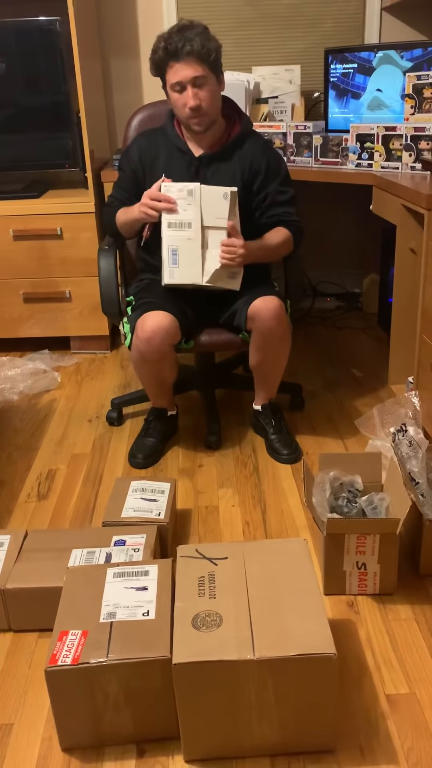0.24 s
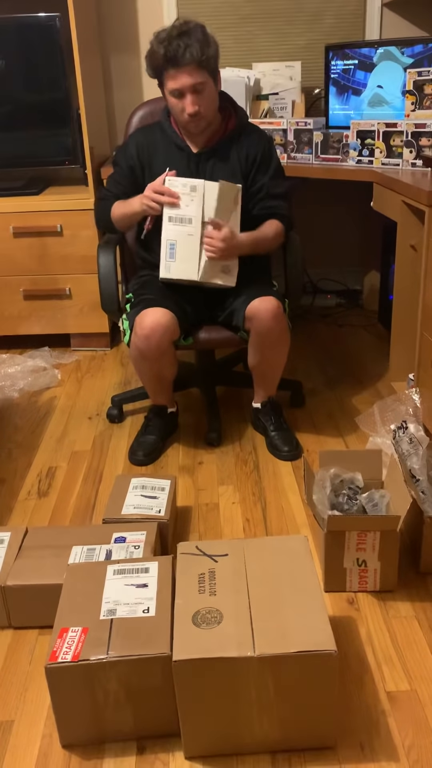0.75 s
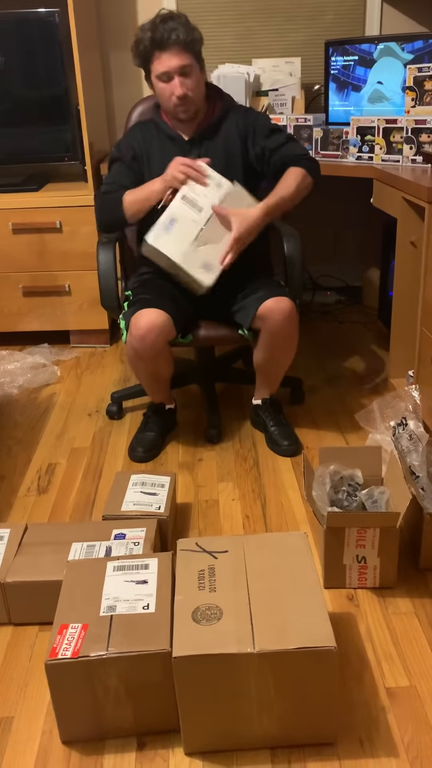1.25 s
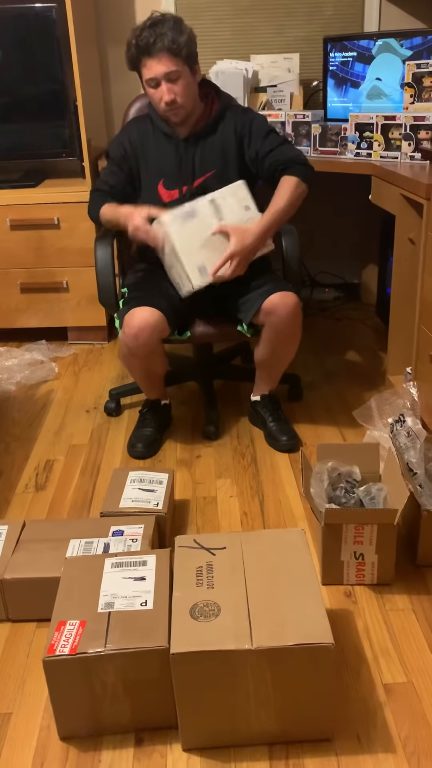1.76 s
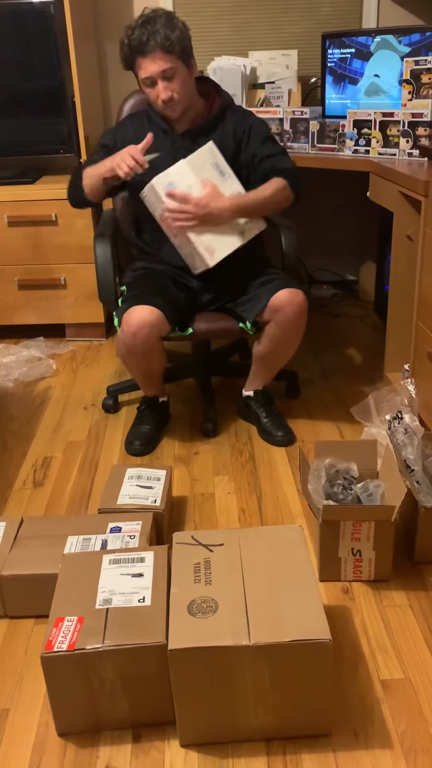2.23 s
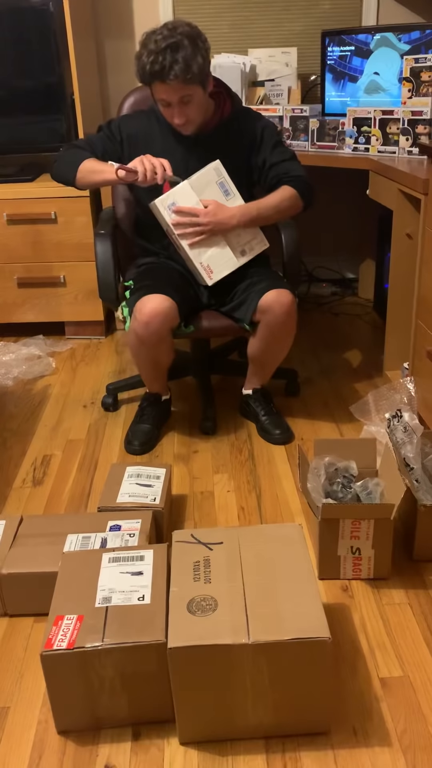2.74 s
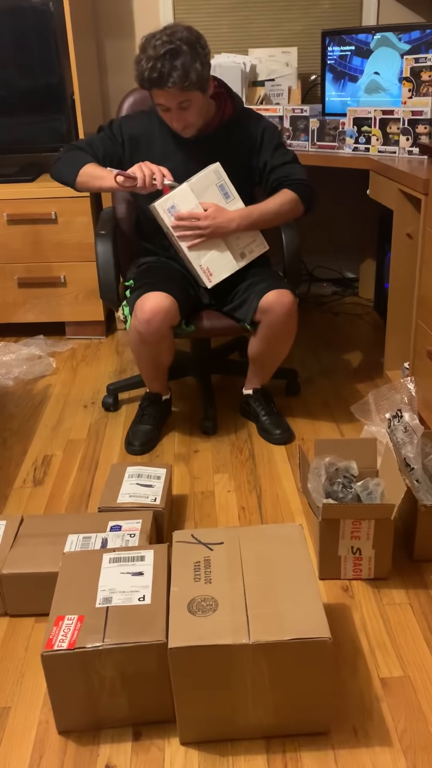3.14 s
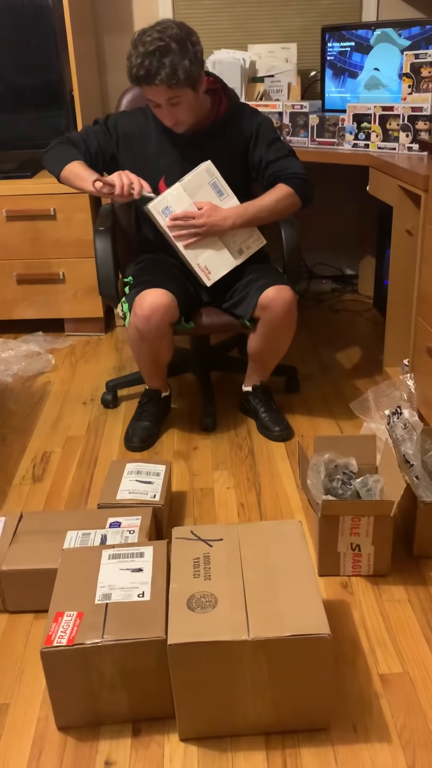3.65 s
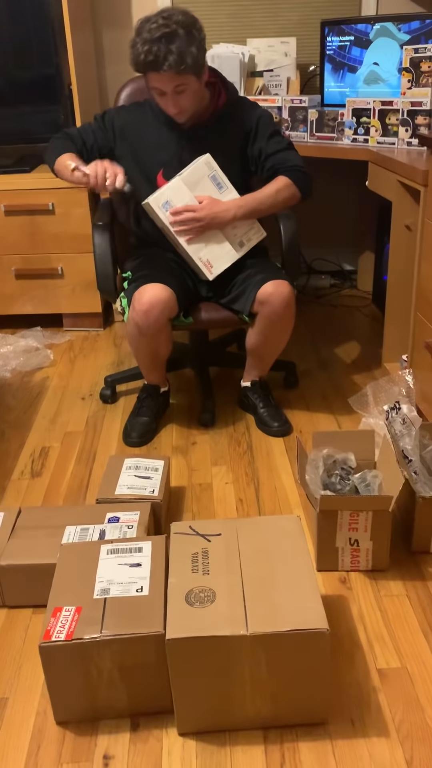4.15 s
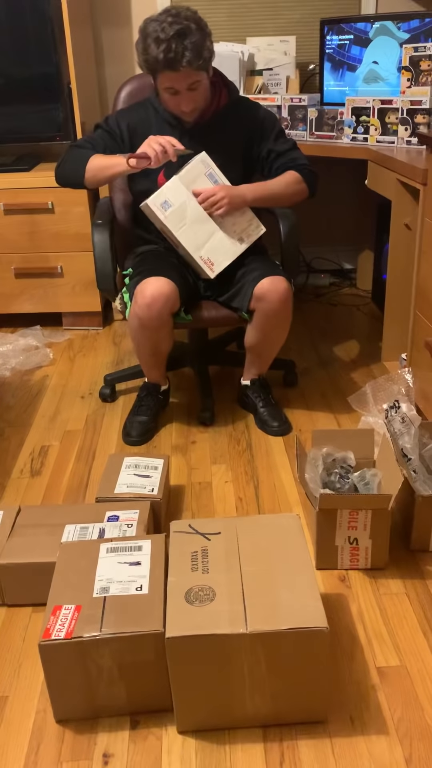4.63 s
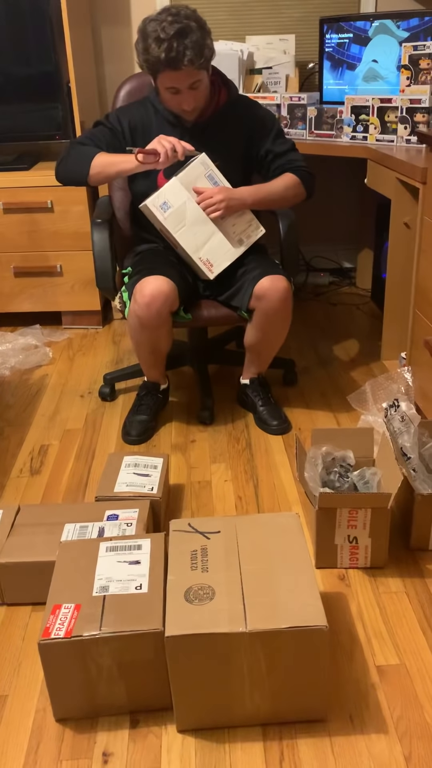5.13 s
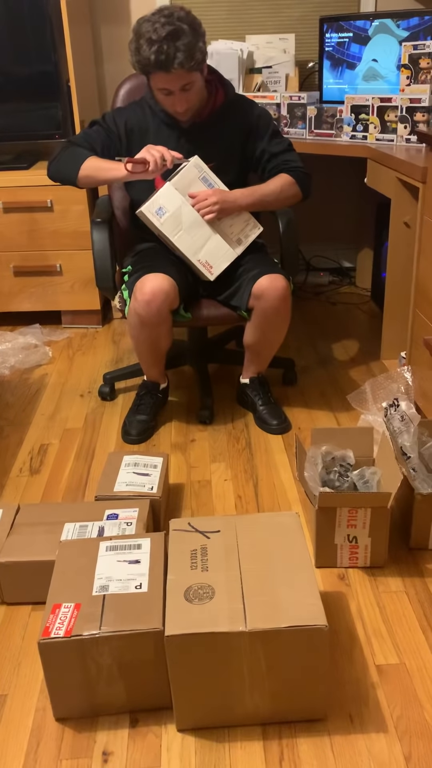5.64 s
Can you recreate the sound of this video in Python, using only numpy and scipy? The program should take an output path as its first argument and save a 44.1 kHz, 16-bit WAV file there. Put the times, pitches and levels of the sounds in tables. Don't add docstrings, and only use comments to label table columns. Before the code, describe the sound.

A cardboard box is slapped, turned and rubbed on a lap, then scissors scrape and saw through its tape in jerky bursts.

```python
import sys
import numpy as np
from scipy import signal
from scipy.fft import rfft, irfft, next_fast_len
from scipy.io import wavfile

SR = 44100
rng = np.random.default_rng(int(sys.argv[2]) if len(sys.argv) > 2 else 0)


def invert_db(x):
    u = np.asarray(x, float) / 20
    return 10 ** u


def materialize(psi):
    bounded = np.clip(np.atleast_2d(psi).T, -1, 1)
    quanta = np.round(bounded * 32767).astype(np.int16)
    wavfile.write(sys.argv[1], SR, quanta)


N = 259731
GRIP_S = 3.3


def rms_one(x):
    return x / np.sqrt(np.mean(x ** 2) + 1e-20)


def at_hz(points, hz):
    table_hz, values = np.transpose(points)
    return np.interp(np.log(hz + 1), np.log(table_hz), values)


def coloured(x, points):
    size = next_fast_len(N)
    gain = invert_db(at_hz(points, np.fft.rfftfreq(size, 1 / SR)))
    return irfft(rfft(x, size) * gain, size)[..., :N]


def band(x, edges_hz, order=2):
    return signal.sosfilt(signal.butter(order, edges_hz, "band", fs=SR, output="sos"), x)


def drift(rate):
    step = 40
    r = np.exp(-2 * step * np.pi * rate / SR)
    noise = rng.standard_normal(N // step + 2002)
    slow = signal.lfilter([1], [1, -2 * r, r * r], noise)[2000:]
    return np.interp(np.arange(N) / step, np.arange(len(slow)), rms_one(slow))


def ring(clicks, hz, width_hz):
    r, w = np.exp(-np.pi * width_hz / SR), 2 * np.pi * hz / SR
    return signal.lfilter([0, np.sin(w)], [1, -2 * r * np.cos(w), r * r], clicks + 1e-18)


def slips(per_s, spread_db, clump_db):
    sizes = invert_db(spread_db * np.minimum(rng.exponential(1, N), 4))
    signs = rng.choice([-1, 1], N)
    chance = per_s * invert_db(clump_db * drift(25)) / SR
    return sizes * signs * (rng.random(N) < chance)


def rubbed(modes, level_db, per_s, spread_db, broad_db, edges_hz):
    train = rms_one(slips(per_s, spread_db, clump_db=3.0))
    rings = 0
    for k, (hz, width_hz, db) in enumerate(modes):
        rings = rings + invert_db(db) * ring(train, hz, width_hz) * (-1) ** k
    broad = band(rng.standard_normal(N), edges_hz)
    return rms_one(rms_one(rings) + invert_db(broad_db) * rms_one(broad)) * invert_db(level_db)


def struck(rows, modes, lift_db, focus_db, scatter_db, contact):
    s, peaks_db, colours_hz = np.array(rows)[:, :3].T
    at, out = (s * SR).astype(int), 0
    luck = rng.standard_normal((len(at), len(modes)))
    for k, (hz, width_hz, db) in enumerate(modes):
        clicks = np.zeros(N)
        octaves_off = np.abs(np.log2(hz / colours_hz))
        near_db = db - focus_db * octaves_off
        clicks[at] = invert_db(peaks_db + lift_db + near_db + scatter_db * luck[:, k])
        pushes = signal.oaconvolve(clicks, contact)[:N]
        out = out + ring(pushes, hz, width_hz) * (-1) ** k
    return out


# pitch in Hz, level in dB.
HUSH = [(13, -31), (22, -1), (290, -5.5), (869, -14.5), (997, -19), (1110, -17.5), (5320, -38.5),
        (9200, -35), (11200, -40), (13100, -31), (15500, -50)]


def hush():
    mid, side = coloured(rng.standard_normal((2, N)), HUSH)
    side = signal.sosfilt(signal.butter(1, 350, "high", fs=SR, output="sos"), side)
    level_db = -66 + 0.74 * drift(3)
    return invert_db(level_db) * rms_one(mid + side * [[1], [-1]])


def room(x):
    t60_s, wall_cut_hz = 0.19, 5700
    size = next_fast_len(N + SR)
    hz = np.fft.rfftfreq(size, 1 / SR)
    turn = np.exp(-2j * np.pi * hz / SR)
    dull = np.exp(-2 * np.pi * wall_cut_hz / SR)
    wall = (1 - dull) / (1 - dull * turn)
    reply = np.zeros((2, len(hz)), complex)
    lags = (rng.uniform(.006, .03, 16) * SR).astype(int)
    for k, lag in enumerate(lags):
        loop = invert_db(-60 * lag / SR / t60_s) * wall * turn ** lag
        reply[k % 2] += loop / (1 - loop) * (-1) ** (k // 2)
    reply[1] *= hz ** 2 / (hz ** 2 + 350.0 ** 2)
    mid, side = irfft(rfft(x, size) * reply, size)[:, :N]
    return mid + side * [[1], [-1]]


def nearby(x):
    age = np.arange(int(.04 * SR)) / SR
    scatter = rng.standard_normal((2, len(age))) * np.exp(-age / 0.0099) * (age > .002)
    return signal.oaconvolve(x[None], scatter / np.linalg.norm(scatter[0]), axes=1)[:, :N]


# start in seconds, end in seconds, level in dB.
BRUSHES = [
    (2.93, 3.165, -70),
    (4.598, 4.85, -71.5),
]
# pitch in Hz, width in Hz, level in dB.
RIDGES = [(1540, 90, -27), (2040, 70, -28)]


def sleeve():
    t, edge_s = np.arange(N) / SR, 0.012
    held = 0
    for start, end, db in BRUSHES:
        held = held + invert_db(db) * np.clip(np.minimum(t - start, end - t) / edge_s, 0, 1)
    cloth = band(rng.standard_normal((2, N)), [1200, 2150], order=5)
    cloth = cloth + sum(invert_db(db) * ring(cloth, hz, width_hz) for hz, width_hz, db in RIDGES)
    return held * invert_db(1.7 * drift(26)) * rms_one(cloth)


# time in seconds, contact level in dB.
CONTACT = [(0, -41), (0.39, -46), (0.6, -59.5), (1.1, -50.5), (1.45, -57), (2.0, -52.5), (2.2, -68.5),
           (2.34, -54), (2.68, -58), (2.75, -95), (3.0, -72), (3.16, -83), (3.3, -74.5), (4.2, -71),
           (4.7, -72), (4.82, -96.5), (5.3, -84), (5.6, -67)]
# peak time in seconds, seconds to rise 20 dB,
# seconds to fall 20 dB, pressure in dB, slip in dB.
TURNS = [(0.045, 0.8, 0.12, -30, -22.5), (0.33, 1, -0.5, -53, -48.5), (0.464, 0.01, 0.21, -41, -35.5),
         (0.7, 0, 0.33, -44, -47), (0.727, 0, 0.07, -42, -32), (0.805, 0.03, 0.1059, -43, -34.5),
         (0.924, -0.13, 0.12, -57.5, -34), (1.1, -0.17, 0.1, -46, -47.5), (1.225, 0.05, 0.1, -41, -39.5),
         (1.3, -0.03, 0.2, -57.5, -44.5), (1.5, 0.06, 0.04, -43, -56), (1.69, 0.17, 0.16, -50, -43),
         (1.756, -0.05, 0.02, -42, -57), (1.814, 0.16, 0.22, -46.5, -67), (1.922, -0.1, 0.15, -47, -49.5),
         (2.1, 0.07, 0.11, -35.5, -49.5), (2.426, 0, 0.08, -50, -80), (2.55, 0.035, 0.15, -46.5, -47.5),
         (2.838, -1.1, 0.2, -63.5, -69.5), (3.233, 0.07, 0.1, -57.5, -57)]
# peak time in seconds, seconds to rise 20 dB,
# seconds to fall 20 dB, pressure in dB, slip in dB.
CUTS = [(3.373, 0.04, 0.0649, -42.5, -39.5), (3.554, 0.0225, 0.2045, -43, -40.5),
        (3.64, 0.1839, 0.16, -46.5, -49.5), (3.7, 0.0457, 0.073, -34, -37),
        (3.79, 0.1934, 0.18, -45.5, -41.5), (3.874, 0.29, 0.01, -44, -44.5),
        (3.985, 0.04, 0.1079, -34.5, -35.5), (4.018, 0.0637, 0.0758, -36.5, -44.5),
        (4.316, 0.06, 0.1, -49.5, -45), (4.602, 0.15, 0.2, -45, -46), (4.934, 3, 0.5, -65, -86),
        (5.2, -0.08, 0.36, -59, -69), (5.44, 0.07, 0, -45.5, -54.5), (5.628, 0.1056, 0, -41.5, -50),
        (5.679, 0.1135, 0.06, -43, -43), (5.722, 0.05, -0.15, -40.5, -49.5), (5.816, 0.03, 0.3, -35.5, -40),
        (5.87, 0.07, 0, -33, -42)]


def handling():
    t = np.arange(0, N + 32, 32) / SR
    rest = invert_db(np.interp(t, *np.transpose(CONTACT)))
    rest_share_db = np.array([[-7.5], [-6.5], [0]])
    power = (rest * invert_db(rest_share_db)) ** 2
    for s, rise_s, fall_s, pressure_db, slip_db in [*TURNS, *CUTS]:
        panel_db = pressure_db + 0.36 * (slip_db - pressure_db) - 6.5
        before, after = (s - t) / max(rise_s, .005), (t - s) / max(fall_s, .01)
        shape_db = -20 * np.where(t < s, before, after)
        power = power + invert_db(np.array([[pressure_db], [panel_db], [slip_db]]) + shape_db) ** 2
    return [np.interp(np.arange(N) / SR, t, 10 * np.log10(p)) for p in power]


# time in seconds, level in dB.
LURCHES = [
    (1.2, -46),
    (1.5, -60),
    (1.76, -56),
    (2.07, -50),
    (2.2, -51.5),
    (2.46, -60),
    (3.221, -62.5),
    (5.73, -52),
]


def lap(hollow_db):
    t, swell_s = np.arange(N) / SR, 0.09
    lurch = sum(invert_db(db - 20 * np.abs(t - s) / swell_s) for s, db in LURCHES)
    level = invert_db(-34 + 0.62 * hollow_db) + lurch
    return invert_db(0.5) * level * rms_one(band(rng.standard_normal(N), [28, 100]))


# pitch in Hz, width in Hz, level in dB.
HOLLOW = [(66, 90, -10.5), (140, 19, 0), (188, 14, -5), (218, 23, -6.5), (285, 25.2, 2.5), (321, 52, 3),
          (406, 42, 2)]
# time in seconds, peak in dB, colour in Hz.
THUMPS = [(0.022, -23, 420), (0.461, -33.5, 323), (0.68, -38, 390), (0.772, -37, 380), (1.073, -38, 167),
          (1.179, -21.5, 315), (1.37, -46.5, 284), (1.48, -44, 122), (1.745, -23.5, 160),
          (1.905, -36.5, 413), (2.055, -24, 310), (2.115, -37, 300), (2.16, -46, 145), (2.405, -42.5, 224),
          (2.538, -45.5, 406), (2.579, -41, 415), (2.67, -50, 416)]
# time in seconds, peak in dB, colour in Hz.
JOLTS = [(3.218, -62, 96.9), (3.366, -37, 146), (3.409, -37.5, 188), (3.551, -40, 143), (3.586, -31, 140),
         (3.628, -34, 256), (3.689, -25, 150), (3.717, -30.5, 140), (3.788, -34.5, 152), (3.864, -29, 149),
         (3.964, -31.5, 137), (3.994, -29, 280), (4.012, -22.5, 247), (4.042, -27, 140),
         (4.301, -43.5, 339), (4.468, -48, 159), (4.595, -36, 428), (4.971, -52, 272), (5.194, -48, 285),
         (5.365, -57, 289), (5.436, -31.5, 153), (5.597, -47, 133.3), (5.624, -32, 140), (5.661, -38, 140),
         (5.714, -29.5, 148), (5.821, -30, 430), (5.849, -31.5, 277), (5.868, -43, 304)]


def hollow(level_db):
    rub = rubbed(HOLLOW, level_db - 3.5, per_s=160, spread_db=2.0, broad_db=-2.5, edges_hz=[90, 500])
    palm = np.hanning(int(0.00084 * SR))
    return rub + struck([*THUMPS, *JOLTS], HOLLOW, lift_db=-2, focus_db=11.0, scatter_db=2.0,
                        contact=palm / palm.sum())


# pitch in Hz, width in Hz, level in dB.
PANELS = [(582, 40, 1.5), (620, 67, -1.5), (780, 110, 5), (930, 80, 2), (1000, 55, 5), (1089.5, 20, -4.5),
          (1150, 230, 1), (1340, 140, -3.5), (1700, 71, -6.5), (1370, 36, -5.5), (1780, 160, -11),
          (2180, 140, 1), (2480, 370, -1)]
# pitch in Hz, width in Hz, level in dB.
GRIPPED = [(285, 33, -2), (606.7, 28, -2.5), (1010, 40, 1.5), (1340, 35, -4.5), (2444, 25, -11),
           (3550, 180, -11)]


def panels(level_db):
    clamped, edges_hz = np.arange(N) > GRIP_S * SR, [420, 2800]
    loose = rubbed(PANELS, level_db - 2.0, per_s=480, spread_db=4.5, broad_db=-1.5, edges_hz=edges_hz)
    tight = rubbed(GRIPPED, level_db - 2.0, per_s=250, spread_db=4.0, broad_db=-15, edges_hz=edges_hz)
    return loose * invert_db(-7 * clamped) + tight * clamped


# pitch in Hz, level in dB, seconds for the bare ring to die by 300 dB.
KNOCK = [(556.4, -4, 0.3), (1237, -1.5, 0.11), (1420, -3, 0.1), (1600, 0, 0.098), (2514, -16, 0.19),
         (2730, -13.5, 0.24), (918, -7, 0.14), (1080, -5.5, 0.14), (3770, -18, 0.14), (4005, -8.5, 0.12),
         (4500, -6, 0.06), (5360, -6, 0.05), (6050, -6.5, 0.04), (470, -8, 0.27)]


def knock():
    start_s = .0203
    age = np.maximum(np.arange(N) / SR - start_s, 0)
    shake = invert_db(-25.5) * rng.standard_normal(N) * np.exp(-age / 0.032) * (age > 0)
    shake[int(start_s * SR)] += 1
    out = 0
    for k, (hz, db, t60_s) in enumerate(KNOCK):
        out = out + invert_db(-14 + db) * ring(shake, hz, 11.0 / t60_s) * (-1) ** k
    return out


# time in seconds, panel peak in dB, panel colour in Hz, dull crack in dB, bright crack in dB.
SLAPS_AND_SNAGS = [(0.001, -38, 2730, -17.5, -24), (0.02, -20, 1150, -19.5, -21.5), (0.132, -60, 1580, -40, -36),
                   (0.208, -43, 918, -58, -48), (0.324, -33, 1010, -53, -56.5), (0.458, -29, 1050, -56, -38),
                   (0.643, -40, 960, -67, -75), (0.727, -42, 982, -40, -40), (0.744, -35.5, 1340, -46, -61),
                   (0.811, -33.5, 580, -72, -56.5), (0.842, -45, 740, -48, -74), (0.925, -36, 2720, -44.5, -35.5),
                   (1.024, -48.5, 1370, -48.5, -53), (1.079, -48, 1400, -49, -48.5), (1.179, -20, 900, -36.5, -41),
                   (1.595, -42.5, 554, -53.5, -53.5), (1.699, -30.5, 1190, -45, -60), (1.744, -33, 816, -49, -52),
                   (1.816, -47, 608, -46, -37), (1.864, -36, 454, -54, -47.5), (1.913, -58, 468, -78, -57),
                   (2.0545, -20, 1100, -43, -43.5), (2.538, -44, 953, -60, -52.5), (2.554, -41.5, 2510, -56, -71),
                   (2.833, -58, 978, -72, -75.5), (2.962, -72, 1500, -88, -58), (3.157, -61.5, 970, -80, -75),
               (3.23, -71, 1780, -53, -85.5), (3.331, -67.5, 2700, -52, -45), (3.36, -41, 680, -45, -37),
               (3.537, -40, 1010, -71, -68), (3.584, -41, 1040, -64, -47), (3.682, -30, 440, -40, -39),
               (3.784, -42, 960, -48, -38), (3.864, -44, 460, -62, -46.5), (3.955, -39.5, 1020, -47.5, -44),
               (3.986, -30.5, 1340, -46, -39), (4.022, -32, 615, -49.5, -64),
                   (4.226, -49.5, 953, -67.5, -74.5), (4.265, -46, 1010, -63, -65),
                (4.307, -36, 2500, -43, -65), (4.371, -47, 1060, -53, -72), (4.554, -50, 1010, -71, -62),
                (4.579, -55, 452, -49, -63), (4.663, -41, 470, -50, -61), (4.98, -64, 470, -91, -86),
                (5.191, -52.5, 940, -73.5, -68), (5.27, -71, 490, -97, -76),
                (5.355, -54, 1010, -62.5, -62.5), (5.431, -38, 536, -57.5, -57.5),
                (5.468, -57.5, 514, -66, -55.5), (5.535, -62, 1010, -59, -52.5),
                (5.587, -43.5, 1070, -50.5, -45), (5.616, -49.5, 780, -62, -51.5),
                (5.658, -44, 1010, -52, -49), (5.812, -29.5, 1010, -38, -42.5), (5.859, -34, 974, -49, -71)]
BLOWS = SLAPS_AND_SNAGS


def slaps():
    out, age = np.zeros(N + SR), np.arange(SR // 5) / SR
    fall = invert_db(-60 * age / 0.083) + 1.9 * np.exp(-age / 0.0049)
    for s, panel_db, hz, dull_db, bright_db in BLOWS:
        shake = invert_db(-11.5) * rng.standard_normal(len(age)) * fall + (age == 0)
        crowd = band(shake, [hz / 2.12, hz * 1.527], order=3)
        i = int((s + .0012) * SR)
        out[i:i + len(age)] += invert_db(panel_db + 11.5) * np.sqrt(1000 / hz) * crowd
    return out[:N] + struck(BLOWS, PANELS, lift_db=-12.5, focus_db=8.5, scatter_db=5.5, contact=np.ones(1))


# time in seconds, peak in dB, pitch in Hz.
TURN_TICKS = [(0.134, -37, 4300), (0.227, -54, 8830), (0.229, -47, 1710), (0.25, -44, 1020),
              (0.258, -47, 1000), (0.288, -53, 8230), (0.371, -45.5, 1020), (0.458, -48, 9430),
              (0.459, -51, 5250), (0.46, -47, 8700), (0.46, -52, 6540), (0.47, -50, 8660),
              (0.473, -52, 4480), (0.474, -49, 8050), (0.497, -51, 9520), (0.724, -50, 9860),
              (0.726, -46, 5760), (0.729, -35.5, 945), (0.733, -41, 4090), (0.745, -32.5, 1370),
              (0.745, -52, 9470), (0.745, -51, 5770), (0.748, -50, 8530), (0.749, -40, 4100),
              (0.764, -47, 4610), (0.805, -46, 8050), (0.809, -43, 10000), (0.811, -40, 1530),
              (0.811, -49, 6370), (0.815, -50, 4820), (0.819, -50, 8050), (0.843, -38, 2700),
              (0.85, -46, 3520), (0.925, -42, 9900), (0.925, -39, 8010), (0.925, -52, 7150),
              (0.93, -53, 4950), (0.931, -41, 6030), (0.932, -37, 2730), (0.936, -48, 8310),
              (0.936, -48, 3780), (0.949, -46, 2650), (0.97, -54, 6030), (0.973, -50, 3900),
              (1.179, -42, 6000), (1.179, -42, 3500), (1.7, -38, 1080), (1.747, -45, 1340),
              (1.816, -38, 6800), (1.818, -51.5, 8360), (1.819, -45, 3950), (1.843, -46, 6500),
              (1.858, -51.5, 8870), (2.058, -29, 940), (2.555, -45, 2490)]
# time in seconds, peak in dB, pitch in Hz.
CUT_TICKS = [(3.336, -51.5, 6200), (3.36, -46, 9700), (3.36, -48, 8740), (3.36, -42, 6160),
             (3.361, -44, 2960), (3.366, -47.5, 4100), (3.381, -52, 8270), (3.392, -43, 8600),
             (3.392, -56, 6160), (3.412, -54, 8700), (3.551, -56, 9200), (3.608, -54, 9300),
             (3.608, -44, 1300), (3.681, -47, 4520), (3.682, -43, 3060), (3.706, -48, 9040),
             (3.706, -50, 8230), (3.743, -45, 9800), (3.744, -45, 8610), (3.744, -47, 3420),
             (3.764, -53, 8440), (3.793, -45, 5940), (3.793, -52, 9300), (3.839, -43, 9690),
             (3.839, -55, 8660), (3.842, -48, 3500), (3.861, -52, 9200), (3.961, -54, 9860),
             (3.985, -39, 9390), (3.986, -50, 7320), (3.989, -44, 6370), (3.989, -35, 1360),
             (3.999, -51, 8010), (4.307, -48.5, 3450), (4.307, -50, 1080), (4.31, -42.5, 2300),
             (4.318, -57, 8270), (4.343, -53, 1030), (4.345, -59, 9260), (4.35, -54, 3450),
             (4.352, -52, 4220), (4.373, -51, 1006), (4.554, -51, 1030), (4.585, -54, 9900),
             (4.586, -53, 3400), (4.588, -48, 2310), (4.596, -49, 4570), (4.636, -49, 1340),
             (4.664, -51, 1770), (5.59, -48, 1030), (5.674, -46, 1030), (5.813, -35.5, 1080),
             (5.814, -39, 2900), (5.815, -45, 6150), (5.834, -50, 9090)]
# time in
# seconds, peak in dB, pitch in Hz.
REBOUNDS = [(1.186, -25, 188), (1.198, -28, 318), (1.205, -30, 188), (2.064, -32, 296), (2.115, -44, 295),
            (2.165, -40, 226), (2.23, -48, 110), (2.19, -50, 120), (4.75, -62.5, 1000), (4.88, -66, 550),
            (4.92, -65.5, 562), (4.975, -63.5, 1000), (5.195, -58, 285), (5.73, -36, 140)]
# time in seconds, peak in dB, pitch in Hz.
EDGES = [(0.0203, -8, 1100), (0.0205, -13, 800), (0.0203, -17, 4500), (0.0203, -18, 6000),
         (0.0203, -26, 8500), (0.027, -20, 1600), (1.1795, -22, 1000), (1.186, -26, 1010),
         (1.222, -33, 880), (1.222, -36, 1250), (2.054, -32, 1500), (2.055, -38, 2200), (2.075, -38, 790),
         (3.523, -46, 2670), (3.533, -42, 1030), (3.667, -42, 1700), (3.69, -38, 600), (3.925, -48, 1000),
         (4.02, -36, 600), (4.299, -48, 4500), (5.433, -42, 700), (5.84, -38, 600)]


def ticks(rows):
    out, age = np.zeros(N + SR), np.arange(SR // 10) / SR
    for s, db, hz in rows:
        width_hz = 29 + 0.024 * hz
        fall = np.exp(-np.pi * width_hz * age) * (1 - np.exp(-age / 0.00044))
        crease = np.sin(2 * np.pi * hz * age)
        neighbour = invert_db(-6) * np.sin(2 * np.pi * 1.06 * hz * age)
        i = int(s * SR)
        out[i:i + len(age)] += invert_db(db) * fall * (crease - neighbour)
    return out[:N]


# pitch in Hz, level in dB per Hz.
TAPE = [(710, -35.5), (1200, -10.5), (1350, -10.5), (1950, -12.5), (3560, -12.5), (5500, -13), (7560, -15),
        (9680, -8.5), (10200, -14.5), (11300, -8), (12400, -11), (13800, -11), (14700, -17.5), (15700, -30)]


def crackle(per_s, spread_db, clump_db, patchy_db):
    train = slips(per_s, spread_db, clump_db)
    dealt, halves = rng.integers(0, 2, N), np.zeros((2, N))
    edges = np.geomspace(1000, 16000, 13)
    for k, (low, high) in enumerate(zip(edges, edges[1:])):
        crease = band(train * (dealt == k % 2) + 1e-18, [low, high])
        halves[k // 8] += crease * invert_db(patchy_db * drift(16))
    return np.array([rms_one(half) for half in coloured(halves, TAPE)])


def cracks():
    out, age = np.zeros((2, N + SR)), np.arange(SR // 4) / SR
    fall = invert_db(-60 * age / 0.09) + invert_db(1) * np.exp(-age / 0.0016)
    fall = fall * (1 - np.exp(-age / 0.00017))
    for s, panel_db, hz, dull_db, bright_db in BLOWS:
        i = int(s * SR)
        out[:, i:i + len(age)] += invert_db(np.array([[dull_db], [bright_db]])) * fall
    return np.sum(out[:, :N] * crackle(per_s=14000, spread_db=1.5, clump_db=4.0, patchy_db=3.0), axis=0)


def tape(level_db):
    dull, bright = invert_db(level_db - 8.5) * crackle(per_s=6700, spread_db=2.0, clump_db=4.5, patchy_db=2.5)
    palms = np.arange(N) < GRIP_S * SR
    return dull + bright * invert_db(2.5 * palms)


def scene():
    hollow_db, panel_db, tape_db = handling()
    rumble = lap(hollow_db)
    box = hollow(hollow_db) + ticks(REBOUNDS)
    low = rumble + box
    high = panels(panel_db) + knock() + slaps() + cracks() + tape(tape_db)
    high = high + invert_db(4.5) * ticks([*TURN_TICKS, *CUT_TICKS]) + ticks(EDGES)
    scatter = invert_db(-5.5) * nearby(high + 0.42 * box)
    echo = room(invert_db(-19.5) * low + invert_db(-13.0) * high)
    return low + high + scatter + echo + hush() + sleeve()


def band_limit(x):
    return signal.sosfilt(signal.butter(12, 15870, fs=SR, output="sos"), x)


# pitch in Hz, lead in radians.
PORT_PHASE = [(60, 0.1), (150, 0.18), (300, 0.38), (600, 1.34), (1300, 0.83), (2800, 1.64), (9000, 1.58),
              (13500, 1.1)]


def record(dry):
    size = next_fast_len(N + 4096)
    hz = np.fft.rfftfreq(size, 1 / SR)
    shift = np.exp(.5j * at_hz(PORT_PHASE, hz) * [[1], [-1]])
    dip_db = -55 * np.exp(-((hz - 11300) / 660) ** 4)
    fall_db = -24 / (1 + np.exp((15100 - hz) / 150))
    balance = invert_db(np.array([[-.2], [.2]]))
    mix = irfft(rfft(dry, size) * shift * invert_db(dip_db + fall_db) * balance, size)[:, :N]
    return band_limit(mix)


dry = scene()
out = record(dry)
materialize(out)
```